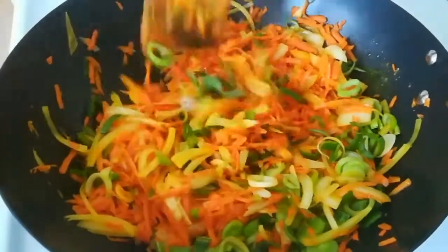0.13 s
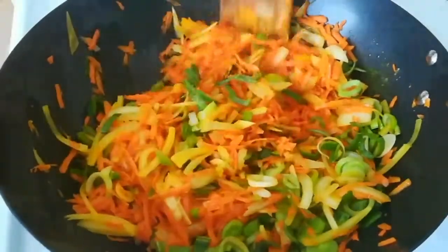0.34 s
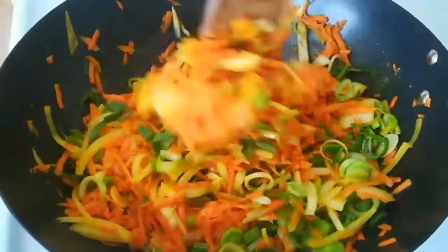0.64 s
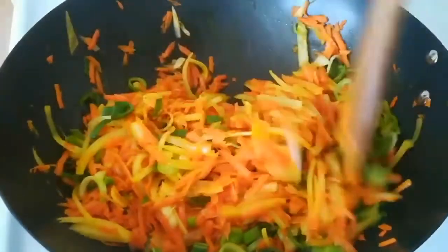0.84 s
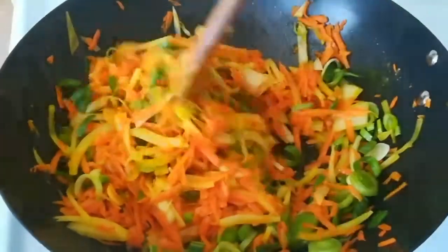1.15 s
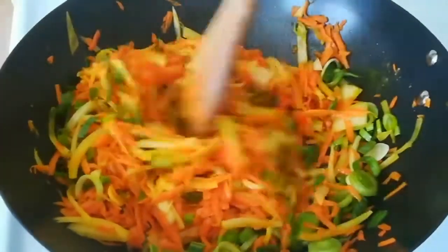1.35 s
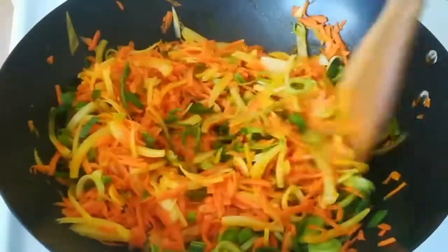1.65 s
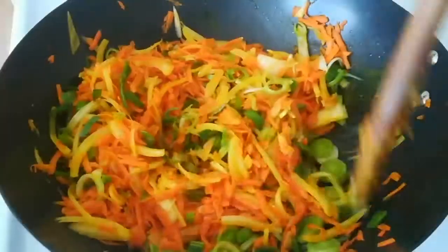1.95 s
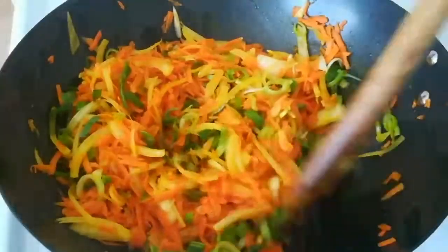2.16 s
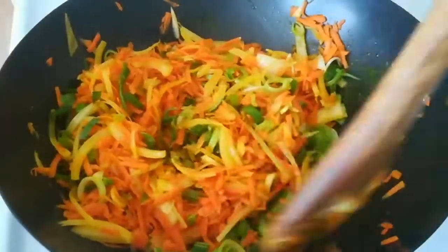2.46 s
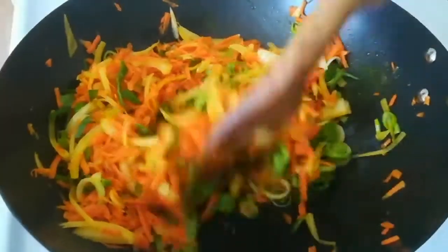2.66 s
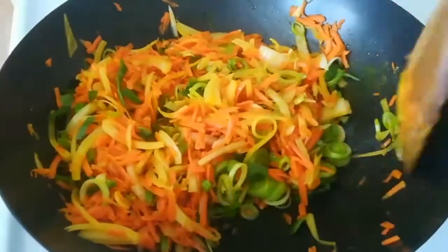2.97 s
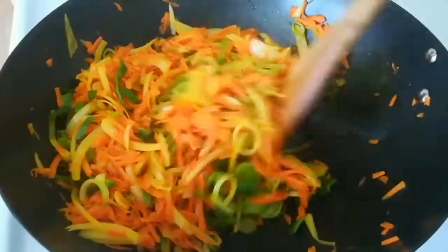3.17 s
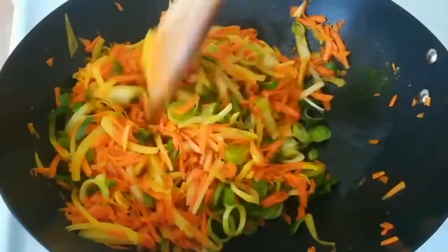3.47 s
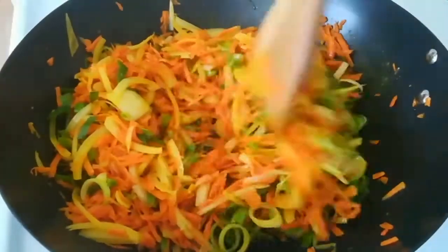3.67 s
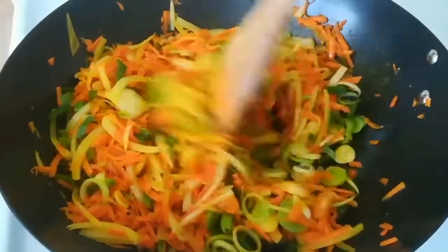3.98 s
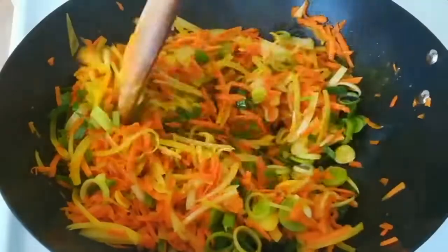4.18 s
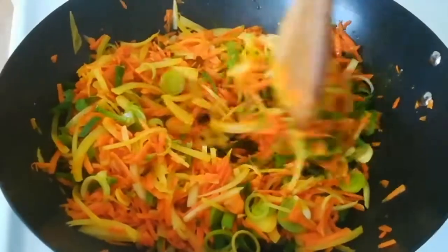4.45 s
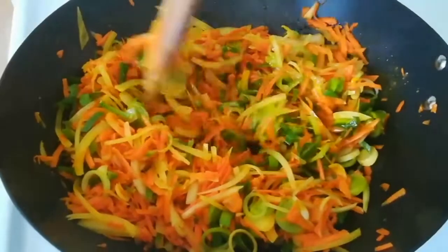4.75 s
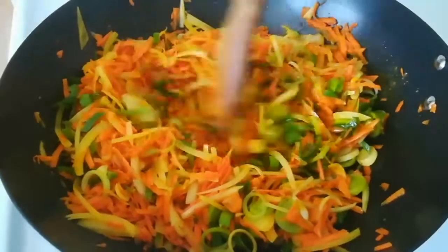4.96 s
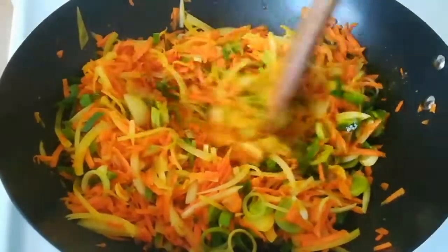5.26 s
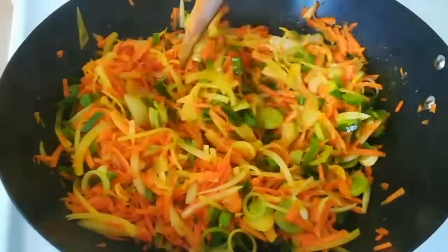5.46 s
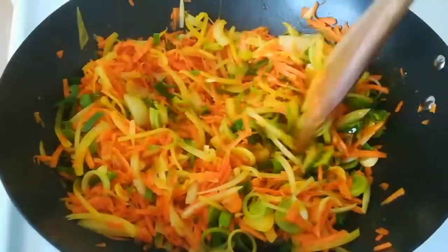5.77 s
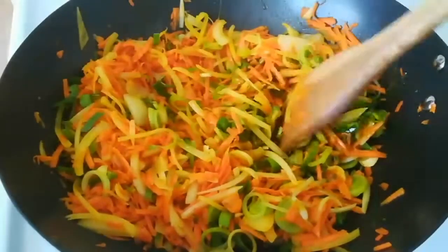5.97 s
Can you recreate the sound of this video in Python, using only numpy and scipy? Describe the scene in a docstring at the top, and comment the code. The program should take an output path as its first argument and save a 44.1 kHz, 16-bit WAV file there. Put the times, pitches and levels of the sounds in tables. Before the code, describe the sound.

Close, crackling frying hiss flares as a wooden spoon turns food, with a hollow clack against the pan and low rubbing rumbles in a small kitchen.

```python
"""Small kitchen: shredded vegetables fry in a steel wok, close to the microphone's two ports.
Frying is dense random pops over steam hiss, with wet bubbling below; each turn of the food flares both.
A wooden spoon rubs along the bowl (noise through its modes), ticks (few-cycle snaps), scrapes (slip pulses)
and knocks: a wooden clack, a food-dulled thud and a short modal ring. Low room noise lies underneath."""
import sys
import numpy as np
from scipy import signal
from scipy.fft import rfft, irfft, next_fast_len
from scipy.io import wavfile
from scipy.ndimage import uniform_filter1d, map_coordinates

SR = 44100
rng = np.random.default_rng(int(sys.argv[2]) if len(sys.argv) > 2 else 0)


def digitize_waveform(pressure):
    """Quantize a signal to 16-bit integers and store it at the path in sys.argv[1].

    Rows of a 2-D input are taken as channels; values are limited to [-1, 1].
    """
    field = np.atleast_2d(pressure).T
    bounded = np.clip(field, -1, 1)
    quanta = np.round(bounded * 32767).astype(np.int16)
    wavfile.write(sys.argv[1], SR, quanta)


N = 269892  # samples

# frying spectrum, relative: freq_hz, density_db
SIZZLE_SPECTRUM = [(300, -30), (450, -11.5), (570, -5), (720, -9), (850, -6.5), (1100, -3), (1600, -3.5),
                   (2400, -0.5), (3400, 0.5), (4500, -1.5), (6000, 0.5), (7200, 2), (8500, -4.5),
                   (10500, -13), (15000, -28)]
# frying at the two ports: freq_hz, left_right_likeness
FRY_ALIKE = [(300, .7), (420, .25), (510, -.65), (590, -.92), (650, -.6), (760, .4), (900, .52),
             (1800, .33), (2450, .52), (3000, .25), (3600, .3), (4500, .1), (7300, .18), (10000, .08)]
# frying at the two ports: freq_hz, left_minus_right_db
FRY_BALANCE = [(500, -4.5), (680, 8.5), (1050, -4), (2000, -1.5), (3300, -0.5), (5500, 0), (7200, -7),
               (9000, -2.5), (10500, -0.5)]
# spoon turns fresh food onto hot steel: start_s, length_s, sizzle_flare_db, bubbling_flare_db
FOOD_TURNS = [(0.243, 0.13, -43.5, -58), (0.59, 0.4, -43.5, -59), (0.845, 0.11, -37.5, -48),
              (1.115, 0.2, -45.5, -50), (1.472, 0.11, -50, -49), (2.512, 0.13, -46.5, -52),
              (3.006, 0.12, -45, -49.5), (3.4, 0.43, -50, -56), (4.058, 0.48, -50, -53),
              (4.693, 0.29, -51.5, -54), (5.03, 0.16, -59, -53), (5.4, 0.32, -48.5, -55)]
# spoon pushes through the food: start_s, length_s, rubbing_db
SPOON_STROKES = [(0.76, 0.08, -55.5), (1.034, 0.11, -56), (1.273, 0.28, -60), (1.556, 0.057, -51.5),
                 (3.385, 0.17, -54.5), (4.08, 0.27, -63), (4.71, 0.15, -51)]
# dragging noise spectrum, relative: freq_hz, density_db
RUB_SPECTRUM = [(40, -8), (100, -6), (145, -0.5), (210, -5), (280, -10.5), (400, -7), (560, -27.5),
                (900, -10), (2000, -17), (5000, -72)]
# low sound at the ports, opposed around the bowl's rocking modes: freq_hz, left_right_likeness
LOW_SOUND_ALIKE = [(60, .99), (140, .98), (260, .9), (420, .55), (520, -.7), (590, -.92), (650, -.6),
                   (760, .45), (2000, .55)]
# modes of the loaded wok: freq_hz, relative_db, t60_s (before each blow's ring length share)
WOK_MODES = [(140.5, -11.5, 0.54), (185.4, -12, 0.25), (214, -15, .35), (263, -0.5, 0.51), (281, -13, 0.48),
             (318, -10, .36), (380, -26.5, 0.46), (423, -16, .34), (554, -12, .18), (608, -2, 0.14),
             (739, -22, 0.15), (870, -20, .56), (1070, -14.5, .29)]
# room noise spectrum, relative: freq_hz, density_db
ROOM_SPECTRUM = [(15, -7.5), (45, -1), (60, 1.5), (95, -11.5), (135, -5), (200, -6), (300, -11.5),
                 (430, -9), (570, -23), (800, -13), (1500, -9.5), (8000, -43)]
# snaps of spoon edge and spitting oil: start_s, level_db (before SNAP_LIFT_DB), centre_hz,
# life_cycles, left_minus_right_db
SPOON_TICKS = [(0.0823, -17, 7340, 1.8, -4), (0.1263, -21, 3100, 4.6, 11), (0.1283, -4, 4370, 0.92, -3.5),
               (0.149, -23, 7100, 5.6, -7), (0.4934, -20, 4720, 1.8, 1), (0.5, -26, 7500, 4, -4),
               (0.6066, -16.5, 4600, 1.3, -1), (0.61, -25.5, 7200, 5.1, -9), (.636, -25, 7940, 6, -6),
               (0.657, -26, 6500, 2, -2), (0.707, -21, 5140, 2.5, 2), (.877, -18, 4300, 1.6, -10),
               (1.202, -28, 5500, 2, -2), (2.074, -35.5, 2040, 3, -2), (2.203, -30, 1300, 2.5, -2),
               (2.434, -34.5, 3340, 4.3, -2), (2.538, -24, 7160, 4.3, -6), (2.836, -23.5, 6940, 2.5, -5),
               (2.959, -23, 6100, 2.6, -2), (2.9618, -11, 2480, 0.63, 0), (2.963, -15, 7160, 3.8, -4),
               (3.054, -27, 6660, 3.6, -9), (3.126, -24.5, 7000, 4.3, 2), (3.74, -26, 7050, 3, -3),
               (4.165, -24, 7100, 3.9, -4), (4.887, -29, 3460, 3.8, 1), (5.271, -35, 7240, 3, -2),
               (5.782, -30, 7190, 3, -3), (5.811, -28, 7540, 3, 3), (5.904, -21.5, 7300, 2.2, 0)]
# spoon blows: start_s, ring_db, favoured_mode_hz, mode_lift_db, ring_length_share,
# thud_db, thud_top_hz, thud_t60_s, clack_db, clack_hz
SPOON_KNOCKS = [(0.1253, -24, 870, 10.5, 1.03, -34, 2300, 0.44, -22.5, 814),
                (1.521, -43, 140, 8, 0.54, -34.5, 420, .15, -33.5, 1440),
                (1.544, -48, 140, 24, 0.83, -37, 420, 0.3, -45, 300),
                (1.586, -44, 140, 21, 0.62, -41, 380, .2, -45, 1350),
                (1.645, -51, 140, 17, 0.31, -39, 230, 0.14, -43, 905),
                (1.91, -42, 342, 23, 0.76, -37.5, 590, .56, -39, 890),
                (2.3069, -37, 136, 21, 0.66, -38.5, 1700, .4, -21, 900),
                (2.324, -40, 296, 6, 0.66, -35, 330, 0.27, -43, 1080),
                (2.359, -43.5, 262, -0.5, 0.8, -34.5, 422, 0.39, -42, 694),
                (2.864, -31, 407, 18, 1, -41.5, 1100, 0.74, -30.5, 1035),
                (2.8678, -37, 700, 16, 1, -39, 700, 0.44, -31, 746)]
# ring at the two ports: freq_hz, left_lead_rad
RING_LEAD_RAD = [(140, -.1), (260, -.35), (430, -.75), (545, -3.1), (610, -3.1), (745, -.3), (1080, 0)]
# ring at the two ports: freq_hz, left_minus_right_db
RING_BALANCE = [(140, -.5), (430, -2), (545, -5), (610, 2.5), (870, 5), (1080, -4)]
# dull body of a blow, relative: freq_hz, density_db
THUD_SPECTRUM = [(30, -13), (70, -1), (100, -5.5), (150, 1), (300, 1.5), (470, 0.5), (560, 8), (780, 3.5),
                 (1100, -1), (1700, -1), (2300, -26), (8000, -60)]
# wooden spoon partials: ratio_to_clack_hz, relative_db (for a -20.5 dB clack)
SPOON_PARTIALS = [(1, -0.5), (1.42, -19), (1.88, -14)]
# spoon's shove flexes the bowl: start_s, level_db, pitch_hz
BOWL_SHOVES = [(0.153, -36.5, 141), (1.51, -53, 94), (1.586, -49, 146), (1.938, -42, 150),
               (2.305, -36.5, 139), (3.399, -49, 159), (3.502, -53, 166), (4.113, -48, 150),
               (4.72, -45.5, 157), (4.771, -43.5, 151)]
# spoon edge chatters over bare steel: start_s, end_s, level_db, centre_hz
EDGE_SCRAPES = [(1.511, 1.625, -53.5, 1410)]
# decay of the walls' answer: freq_hz, t60_s
KITCHEN_DECAY = [(150, 0.39), (1500, 0.35), (10000, 0.4)]

# still food: starting levels, both sinking as the steel cools
SIZZLE_DB, WET_DB, COOLING_DB_PER_S = -45, -51, 0.34
FLARE_RISE_S, FLARE_FALL_S = 0.023, 0.068  # pieces land; surface water boils off
WALL_DELAY_S = 0.00392  # extra path via the wall behind the hob
STIR_DB = -61.5  # light rubbing between pushes
STROKE_RISE_S, STROKE_FALL_S = 0.023, 0.097  # spoon bites; rumble dies
BOWL_DB = -3  # bowl resonance over plain dragging noise
SNAP_LIFT_DB = 5.0
SWELL_S, SWELL_HZ = 0.047, 453  # rise constant of the lowest modes; shorter above this pitch
RING_ROUGH, RING_ROUGH_HZ = 0.27, 46.4  # shifting food unsettles each mode: depth, speed
SHOVE_S = 0.011  # time to the widest swing
TOP_HZ = 15600  # microphone band limit
SIDES = np.array([[.5], [-.5]])  # left, right share of a level or phase difference


def amp(db):
    """Decibels to gain."""
    return 10 ** (np.asarray(db) / 20)


def unit(x):
    """x at rms 1."""
    return x / np.sqrt(np.mean(x ** 2) + 1e-20)


def along(points, hz):
    """Interpolate (Hz, value) points on a log frequency axis."""
    f, v = np.transpose(points)
    return np.interp(np.log(hz + 1), np.log(f + 1), v)


def wobble(rate_hz):
    """Smooth random curve, rate_hz knots a second."""
    knots = rng.standard_normal(int(N * rate_hz / SR) + 4)
    return map_coordinates(knots, [np.arange(N) * rate_hz / SR])


def filtered(x, response):
    """Multiply the spectrum of x by response(hz)."""
    n = x.shape[-1]
    m = next_fast_len(n + SR // 5)
    return irfft(rfft(x, m) * response(np.fft.rfftfreq(m, 1 / SR)), m)[..., :n]


def add(track, start_s, sound):
    """Mix a stereo sound into track from start_s."""
    part = track[:, max(round(start_s * SR), 0):][:, :sound.shape[-1]]
    part += sound[..., :part.shape[-1]]


def swell(start_s, length_s, rise_s, fall_s):
    """Gain that rises, holds until length_s has passed, then decays exponentially."""
    age_s = np.arange(N) / SR - start_s
    return np.clip(age_s / rise_s, 0, 1) * np.exp(-np.maximum(age_s - length_s, 0) / fall_s)


def spread(pair, spectrum, alike):
    """Turn two unrelated signals into a coloured, partly alike stereo pair of rms 1."""
    def mid_side(hz):
        turn = np.arccos(np.clip(along(alike, hz), -1, 1)) / 2
        return amp(along(spectrum, hz)) * [np.cos(turn), np.sin(turn)]

    mid, side = filtered(pair, mid_side)
    return unit(np.array([mid + side, mid - side]))


def low_noise(spectrum, n):
    """Stereo noise whose bass is nearly the same at both ports."""
    return spread(rng.standard_normal((2, n)), spectrum, LOW_SOUND_ALIKE)


def pops(rate_hz, scatter_db):
    """Two trains of randomly timed impulses, capped log-normal sizes, rms 1."""
    size_db = scatter_db * np.minimum(rng.standard_normal((2, N)), 2.5)
    sizes = amp(size_db) * rng.choice([-1, 1], (2, N))
    return unit(sizes * (rng.random((2, N)) < rate_hz / SR))


def patches(pair, depth_db):
    """Clusters of bubbles of one size briefly favour their own pitch."""
    z = signal.stft(pair, nperseg=1024)[2]
    field = uniform_filter1d(rng.standard_normal(z.shape[1:]), size=4, axis=0)
    field = uniform_filter1d(field, size=5, axis=1)
    return signal.istft(z * amp(depth_db * unit(field)), nperseg=1024)[1][:, :N]


def frying_levels():
    """Sizzle and bubbling in dB: cooling bed plus one flare per turn of the food, summed as power."""
    bed_db = np.array([[SIZZLE_DB], [WET_DB]]) - COOLING_DB_PER_S * np.arange(N) / SR
    power = amp(bed_db) ** 2
    for start_s, length_s, sizzle_db, wet_db in FOOD_TURNS:
        flare = swell(start_s, length_s, FLARE_RISE_S, FLARE_FALL_S)
        power = power + (amp([[sizzle_db], [wet_db]]) * flare) ** 2
    return 10 * np.log10(power)


def from_pan(x, lead_s, echo_db, echo_delay_s):
    """Pan lies nearer the left port, the right is louder in the treble; a close wall adds one echo."""
    def ports(hz):
        # the whole bowl radiates long waves, so they reach both ports together
        delay_s = lead_s * hz ** 2 / (hz ** 2 + 1150 ** 2)
        return amp(SIDES * along(FRY_BALANCE, hz)) * np.exp(2j * np.pi * hz * delay_s * SIDES)

    def wall(hz):
        echo = np.exp(-2j * np.pi * hz * echo_delay_s) / (1 + (hz / 4000) ** 2)
        return 1 + amp(echo_db) * echo

    return filtered(x, lambda hz: ports(hz) * wall(hz))


def frying():
    """Bursting micro-bubbles and sparse crackles over steam hiss; wetter bubbles fill the lower range."""
    sizzle_db, wet_db = frying_levels()
    micro_bubbles = pops(rate_hz=1700, scatter_db=2.0)
    steam = amp(1.5) * rng.standard_normal((2, N))
    crackles = amp(-14.5) * pops(rate_hz=71, scatter_db=2.5)
    fry = spread(unit(micro_bubbles + steam + crackles), SIZZLE_SPECTRUM, FRY_ALIKE)
    wet = filtered(fry, lambda hz: 1 / (1 + (hz / 3000) ** 4))
    sizzle = unit(patches(fry - wet, depth_db=2.5)) * amp(sizzle_db + 0.58 * wobble(45))
    bubbling = unit(patches(wet, depth_db=2.5)) * amp(wet_db + 1.4 * wobble(35))
    return from_pan(sizzle + bubbling, lead_s=0.0002377, echo_db=-19.0, echo_delay_s=WALL_DELAY_S)


def bowl(hz):
    """Response of the wok's modes, damped to one width by the pressing spoon."""
    width_hz = 22
    damping = 1j * hz * width_hz
    return sum(amp(db) * damping / (f * f - hz * hz + damping) for f, db, _ in WOK_MODES)


def rubbing():
    """Spoon drags through the food; the bowl rumbles on its low modes, more so at each push."""
    pushes = sum((amp(db) * swell(start_s, length_s, STROKE_RISE_S, STROKE_FALL_S)) ** 2
                 for start_s, length_s, db in SPOON_STROKES)
    unevenness_db = 1.8 * wobble(28)
    drag = low_noise(RUB_SPECTRUM, N)
    rumble = unit(drag + amp(BOWL_DB) * unit(filtered(drag, bowl)))
    return rumble * np.sqrt(amp(STIR_DB) ** 2 + pushes) * amp(unevenness_db)


def room_noise():
    """Steady low noise of the kitchen."""
    return amp(-55.5) * low_noise(ROOM_SPECTRUM, N)


def ticks():
    """Snaps of a few cycles, each with a brief noisy scatter around the bowl."""
    out, t = np.zeros((2, N)), np.arange(SR // 40) / SR
    for start_s, db, centre_hz, cycles, pan_db in SPOON_TICKS:
        band_hz = [centre_hz / 1.3, centre_hz * 1.6]
        band = signal.butter(2, band_hz, "band", fs=SR, output="sos")
        # right port hears the snap 40 us later; age in cycles
        age = np.maximum(t - np.array([[0], [.00004]]), 0) * centre_hz
        snap = np.sin(2 * np.pi * age) * np.exp(-age / cycles) * (1 - np.exp(-age / 1.97))
        scatter = unit(signal.sosfilt(band, rng.standard_normal((2, len(t)))))
        scatter = scatter * amp(-18.0 - 60 * t / 0.015)
        add(out, start_s, amp(db + SNAP_LIFT_DB + pan_db * SIDES) * (snap + scatter))
    # small contacts radiate no bass and little of the highest treble
    return filtered(out, lambda hz: 1 / (1 + (hz / 9000) ** 8) * (1 - 1 / (1 + (hz / 1500) ** 3)))


def ring_modes(t, favoured_hz, lift_db, length_share):
    """Wok modes swell and decay; blow place favours some, a resting spoon shortens all."""
    hz, mode_db, t60_s = np.transpose(WOK_MODES)[:, :, None]
    # low modes swell slowly, high ones speak almost at once
    onset = 1 - np.exp(-t * (1 + (hz / SWELL_HZ) ** 2) / SWELL_S)
    weight_db = mode_db + lift_db * np.exp(-(np.log2(hz / favoured_hz) / 0.24) ** 2)
    knots = rng.standard_normal((len(hz), 64, 2)) @ [1, 1j]
    drift = np.array([np.interp(t * RING_ROUGH_HZ, np.arange(len(k)), k) for k in knots])
    decay = amp(weight_db - 60 * t / (t60_s * length_share))
    phase = np.exp(2j * np.pi * (hz * t + rng.random(hz.shape)))
    return onset * (1 + RING_ROUGH * drift) * decay * phase


def dull_thud(t, top_hz, t60_s):
    """Decaying low noise; food under the spoon cushions the blow and cuts the top."""
    thud = filtered(low_noise(THUD_SPECTRUM, len(t)), lambda f: 1 / np.sqrt(1 + (f / top_hz) ** 8))
    return thud * amp(-60 * t / t60_s) * (1 - np.exp(-t / 0.00062))


def wooden_clack(t, clack_db, clack_hz):
    """Wood swings only during contact; softer blows lose its upper partials."""
    u = t / 0.0024
    swing = 2 * np.pi * clack_hz * t
    softness_db = .5 * (clack_db + 20.5)
    partials = sum(amp(db + (ratio - 1) * softness_db) * np.sin(ratio * swing)
                   for ratio, db in SPOON_PARTIALS)
    return u ** 2 * np.exp(1 - u ** 2) * partials


def knocks():
    """Each blow: hollow wooden clack, dull thud, and the wok's modes swelling and dying."""
    out, t = np.zeros((2, N)), np.arange(int(.55 * SR)) / SR
    mode_hz = np.transpose(WOK_MODES)[0][None, :]
    ports = amp(SIDES * along(RING_BALANCE, mode_hz)) * np.exp(1j * SIDES * along(RING_LEAD_RAD, mode_hz))
    for (start_s, ring_db, favoured_hz, lift_db, length_share,
         thud_db, top_hz, thud_t60_s, clack_db, clack_hz) in SPOON_KNOCKS:
        modes = ring_modes(t, favoured_hz, lift_db, length_share)
        add(out, start_s, amp(ring_db) * (ports @ modes).real)
        add(out, start_s, amp(thud_db) * dull_thud(t, top_hz, thud_t60_s))
        add(out, start_s, amp(clack_db) * wooden_clack(t, clack_db, clack_hz))
    return out


def shoves():
    """Short, deep bump as the spoon's weight meets the bowl."""
    out, t = np.zeros((2, N)), np.arange(SR // 8) / SR
    u = t / SHOVE_S
    for start_s, db, pitch_hz in BOWL_SHOVES:
        add(out, start_s, amp(db) * u ** 2 * np.exp(2 - 2 * u) * np.sin(2 * np.pi * pitch_hz * t))
    return out


def scrapes():
    """Quick slips of the wooden edge excite one broad resonance."""
    out, t = np.zeros((2, N)), np.arange(N) / SR
    for start_s, end_s, db, centre_hz in EDGE_SCRAPES:
        slips = spread(pops(rate_hz=420, scatter_db=5), [(1000, 0)], LOW_SOUND_ALIKE)  # flat spectrum
        rasp = filtered(slips, lambda hz: np.exp(-((hz - centre_hz) / 170) ** 4))
        fade = np.clip(np.minimum(t - start_s, end_s - t) / .01, 0, 1)
        out += amp(db) * unit(rasp) * fade
    return out


def kitchen(x):
    """Short, diffuse answer of the walls: decaying noise, different at each port, 5 ms late."""
    hz, t, z = signal.stft(rng.standard_normal((2, SR // 2)), SR, nperseg=256)
    decay = amp(-60 * t / along(KITCHEN_DECAY, hz)[:, None])
    tail = signal.istft(z * decay, SR, nperseg=256)[1]
    late = np.pad(x, ((0, 0), (SR // 200, 0)))
    return signal.fftconvolve(late, tail / np.linalg.norm(tail[0]), axes=1)[:, :N]


def scene():
    """Frying and spoon over low room noise; walls answer knocks, shoves and ticks."""
    blows, snaps = knocks() + shoves(), ticks()
    walls = kitchen(amp(-23.0) * blows + amp(-5) * snaps)
    return frying() + rubbing() + room_noise() + snaps + blows + scrapes() + walls


def record(dry):
    """Nothing passes above the microphone's band limit."""
    return filtered(dry, lambda hz: hz < TOP_HZ)


dry = scene()
out = record(dry)
digitize_waveform(out)
```